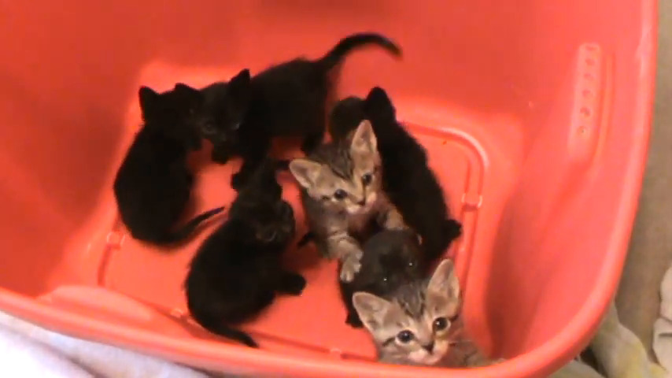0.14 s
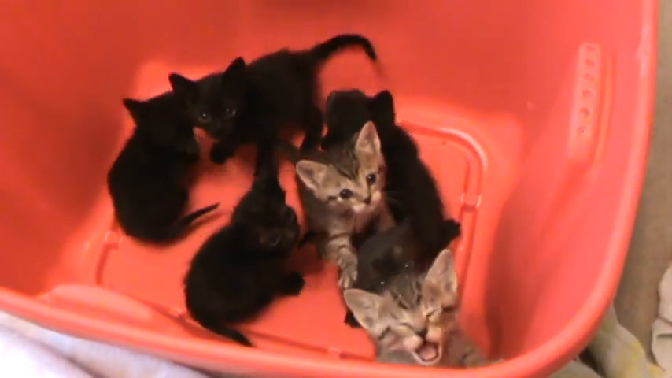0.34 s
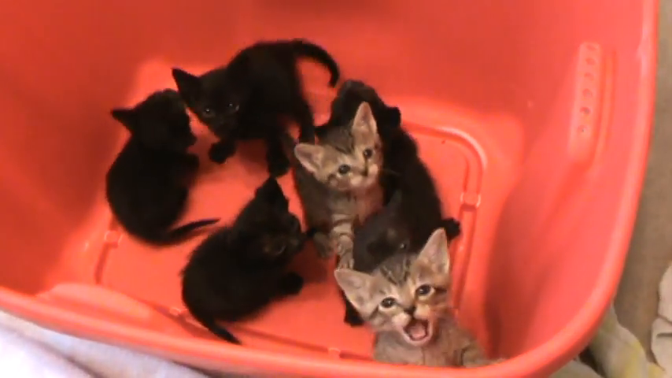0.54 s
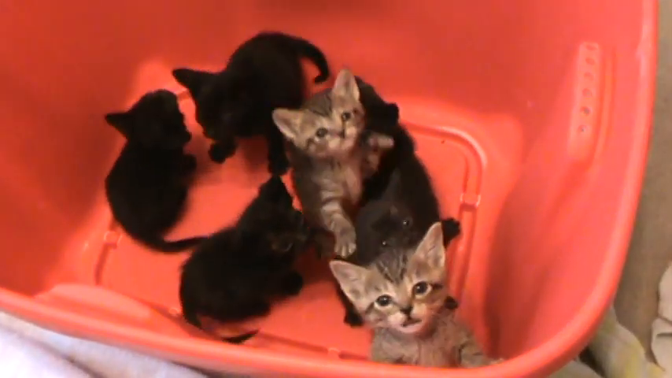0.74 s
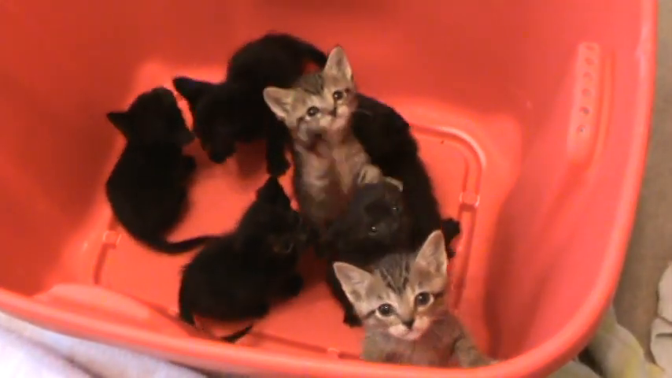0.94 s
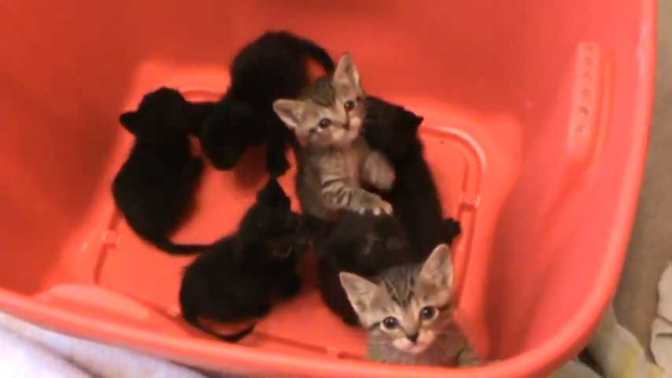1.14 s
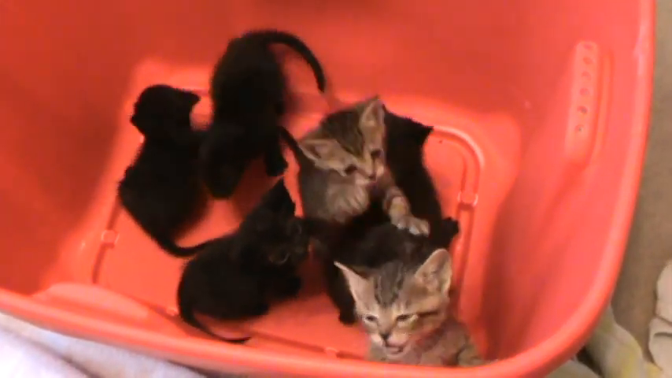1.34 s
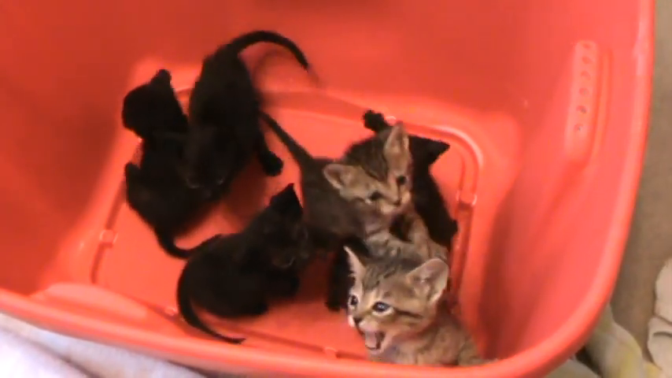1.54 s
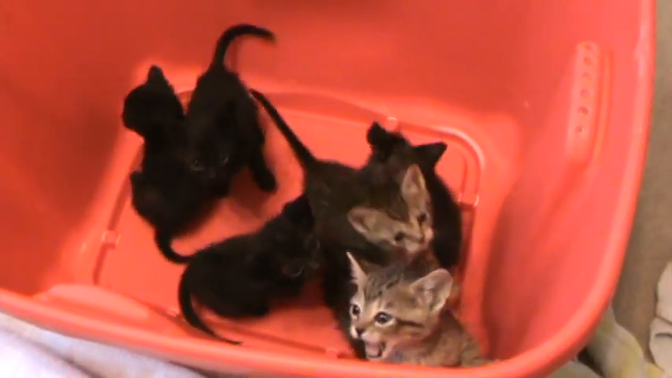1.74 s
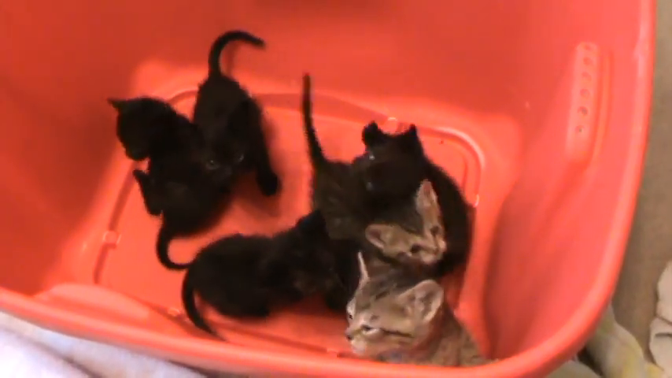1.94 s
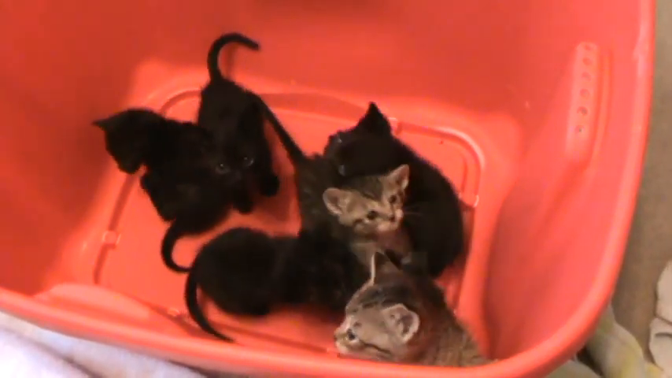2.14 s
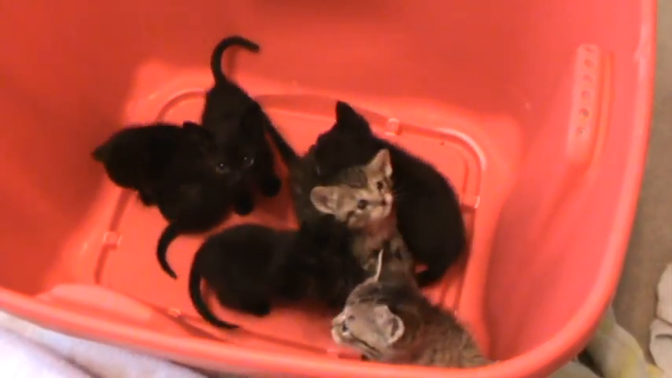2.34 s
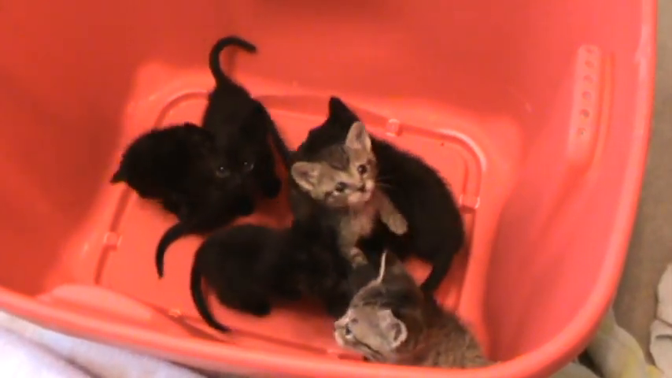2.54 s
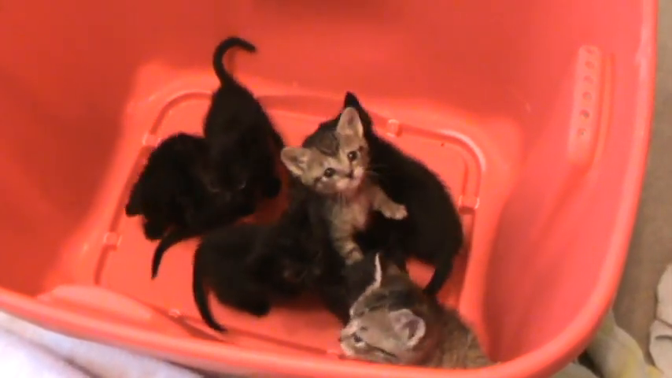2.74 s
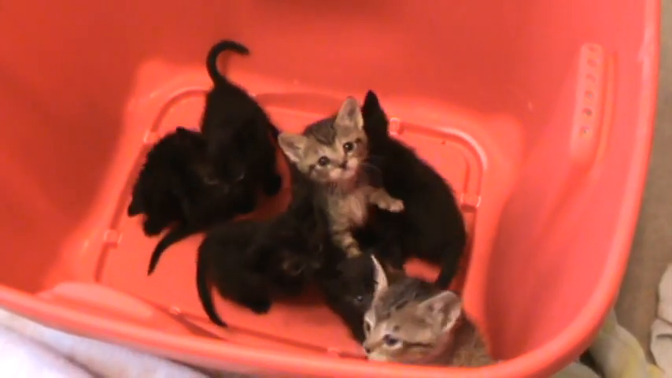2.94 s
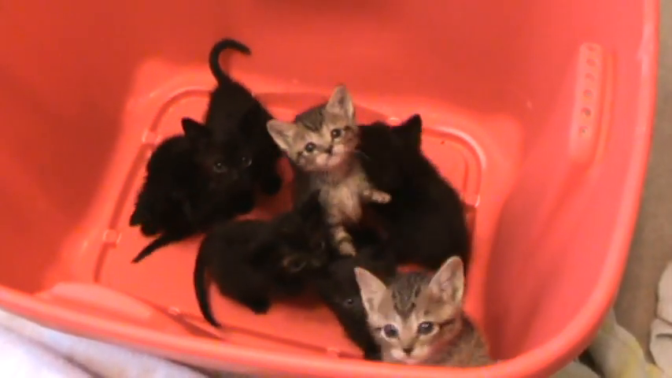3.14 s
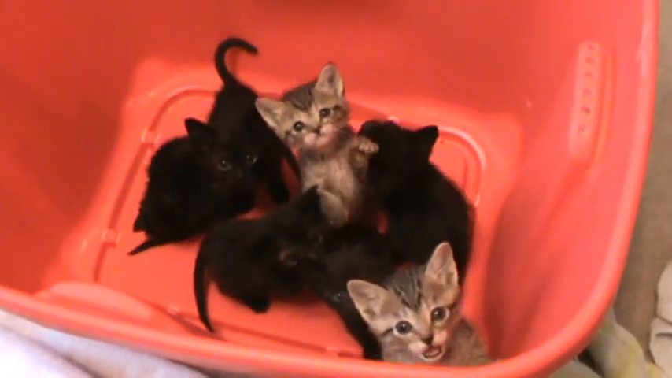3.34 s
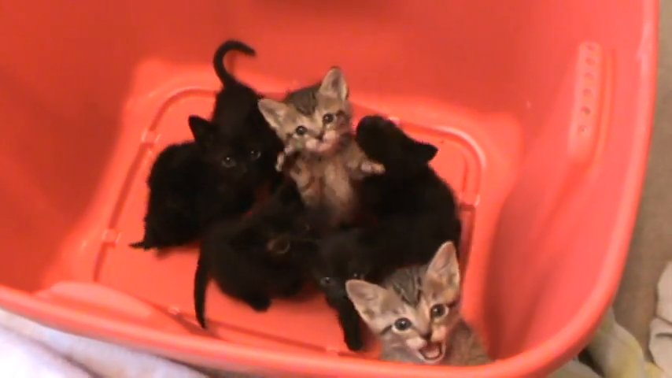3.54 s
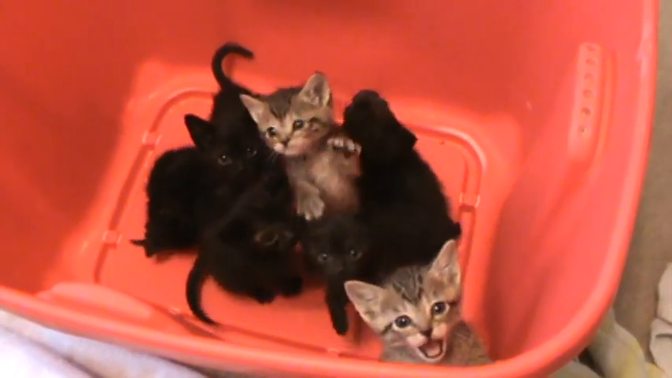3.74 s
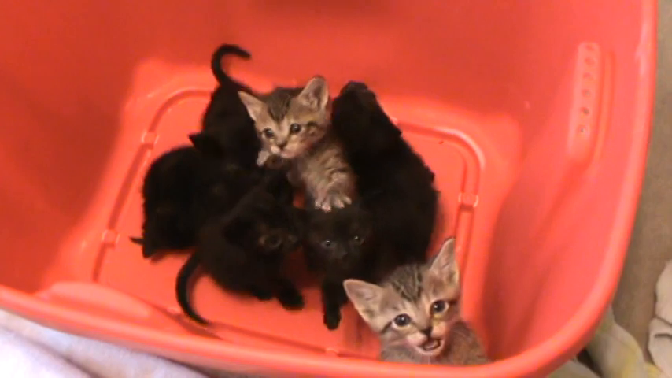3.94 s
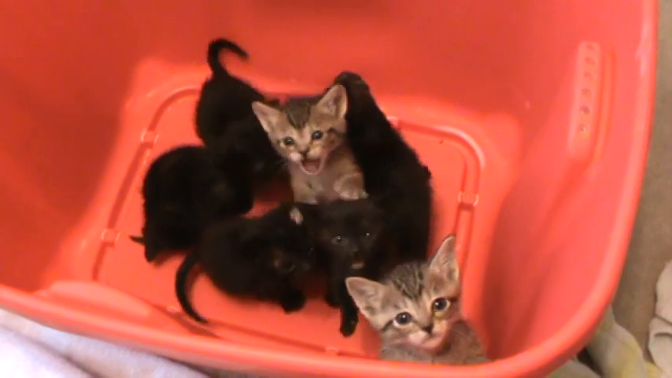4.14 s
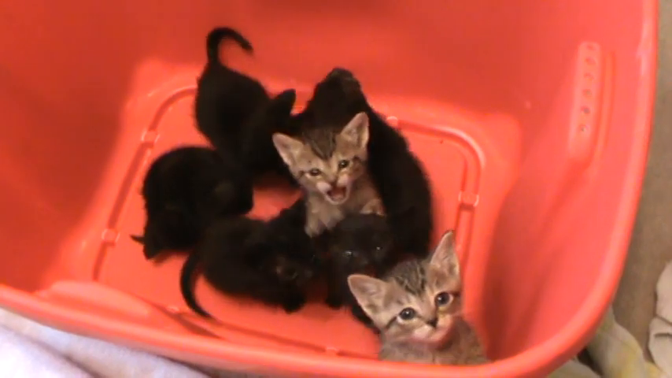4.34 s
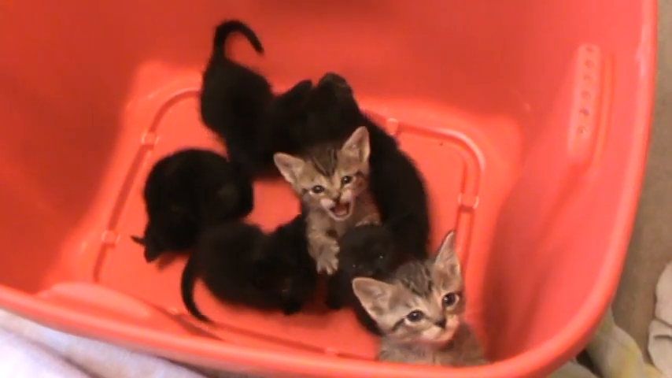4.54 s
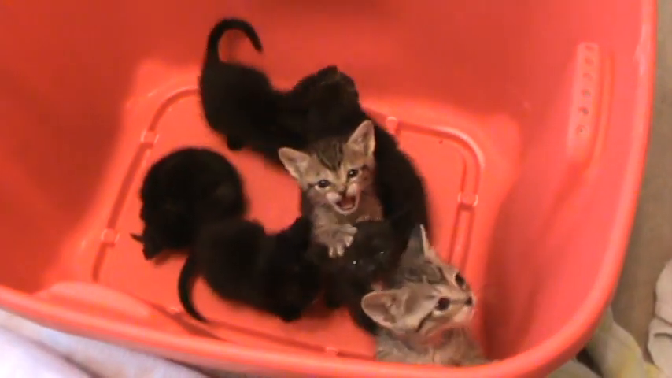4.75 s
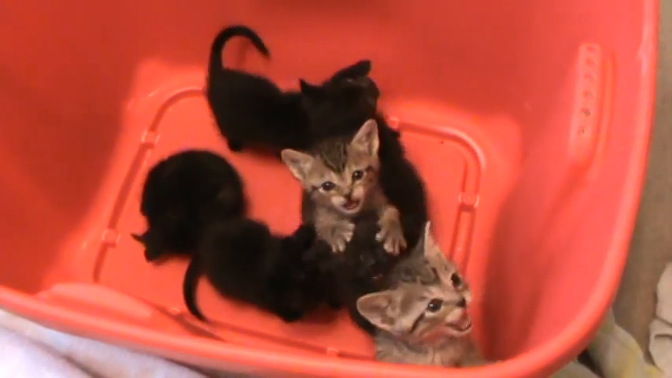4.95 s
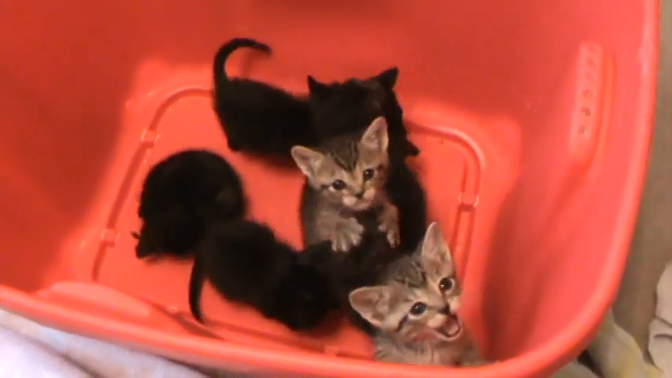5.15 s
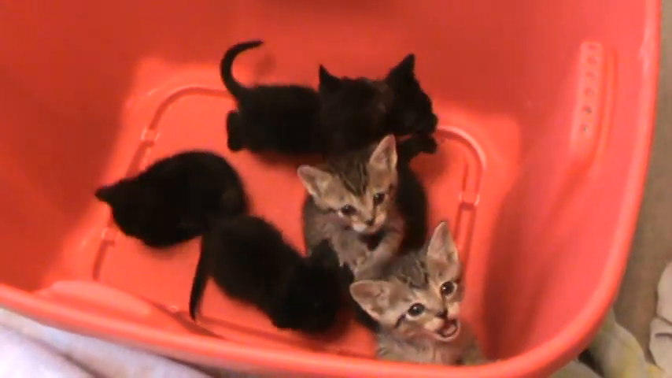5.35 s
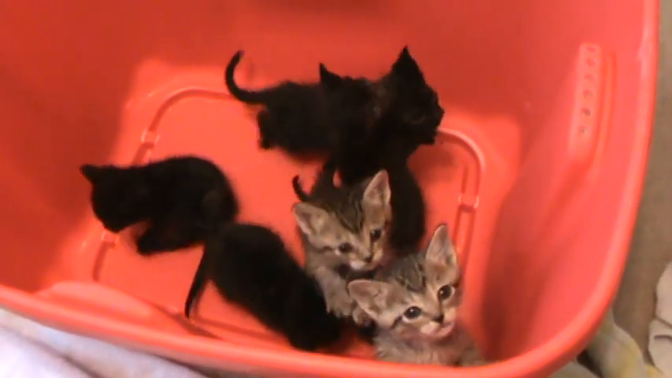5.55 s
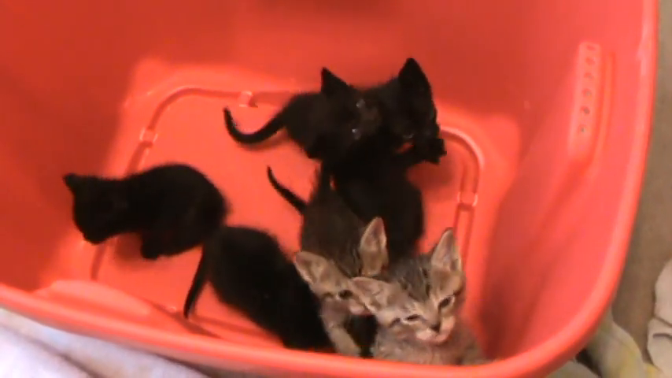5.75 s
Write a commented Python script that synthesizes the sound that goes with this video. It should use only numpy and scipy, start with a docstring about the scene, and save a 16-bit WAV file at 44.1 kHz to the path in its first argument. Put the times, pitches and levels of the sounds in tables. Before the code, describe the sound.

Close-up of tiny kittens calling for food in a plastic tub, in a quiet room with faint low hush. Two mews already under way fade by 0.4 s, with soft hollow paw bumps around 0.2 s. A loud, shrill meow runs from 0.25 to 0.9 s with a weaker voice beneath, splitting into a rough double tone near 0.7 s. From 0.95 to 1.95 s a rising call is joined by a piercing cry and a fainter one, with small thuds between. After a lull, a softer mew swells from 2.5 to 3.4 s; a low scuffle at 3.3 s leads into another sharp cry until 4.1 s. Three lower, hoarser voices overlap from 3.9 to 5.1 s. A final bright cry rises at 4.9 s, cracks and ends around 5.5 s, leaving light fur and claw brushing that grows toward the end. Echoes are short.

```python
"""Hungry kittens in a plastic tub

Kittens meow, up to three at once. Each meow is an arched stack of harmonics shaped by throat, nose and mouth.
A voice turns hoarse as its pitch falls from the top; voices crack now and then, and one cry splits in two.
Paws ring the tub's low modes; filtered noise makes the rumble, the brushing of fur and claws, and the room's hush.
Fading noise serves as the short echoes of tub and room, and a limiter holds down the loudest cries."""
import sys
import numpy as np
from scipy import signal
from scipy.fft import rfft, irfft
from scipy.io import wavfile
from scipy.ndimage import uniform_filter1d, minimum_filter1d, map_coordinates

SR = 44100
rng = np.random.default_rng(int(sys.argv[2]) if len(sys.argv) > 2 else 0)


def digitize_waveform(pressure):
    """Quantize a signal to 16-bit integers and store it at the path in sys.argv[1].

    Rows of a 2-D input are taken as channels; values are limited to [-1, 1].
    """
    field = np.atleast_2d(pressure).T
    bounded = np.clip(field, -1, 1)
    quanta = np.round(bounded * 32767).astype(np.int16)
    wavfile.write(sys.argv[1], SR, quanta)


N = 259308
TIME = np.arange(N) / SR
TOP_HZ = 15800  # nothing sounds above this

# pitch arch of each meow: start_s, top_s, end_s, start_hz, top_hz, sag_hz, final drop_hz,
# rise_power [no unit], sag_power [no unit]
PITCH_ARCHES = [(-0.5, -0.091, 0.409, 800, 1297, 330, 202, 2.5, 2.8),
                (-0.6, -0.15, 0.21, 800, 1275, 196, 271, 2.5, 2.0),
                (0.254, 0.481, 0.875, 1165, 1690, 170, 170, 2.1, 1.0),
                (0.379, 0.587, 0.948, 1017, 1243, 204, 74, 1.9, 1.0),
                (0.948, 1.583, 1.936, 758, 1382, 222, 198, 3.9, 2.2),
                (1.357, 1.636, 1.966, 878, 1629, 257, 156, 2.4, 2.2),
                (1.357, 1.67, 1.856, 937, 1137, 132, 187, 2.7, 1.6),
                (2.49, 3.044, 3.377, 690, 1268, 306, 186, 3.0, 1.4),
                (3.327, 3.635, 4.111, 996, 1666, 196, 321, 2.5, 1.0),
                (3.93, 4.407, 4.829, 551, 1099, 142, 247, 4.4, 1.8),
                (4.126, 4.315, 5.138, 1020, 1397, 396, 239, 1.2, 2.6),
                (4.146, 4.469, 4.89, 970, 1285, 50, 40, 2.4, 3.0),
                (4.869, 5.266, 5.542, 833, 1625, 267, 378, 3.3, 1.0)]


def undb(db):
    """Turn decibels into gain."""
    return 10 ** (np.asarray(db) / 20)


def colour_db(hz, points):
    """Read a spectrum given as (Hz, dB) points, with straight lines between them on a log-frequency axis."""
    point_hz, point_db = np.transpose(points)
    return np.interp(np.log(hz + 1), np.log(point_hz), point_db)


def noise(points, count):
    """Coloured noise of rms 1: white noise filtered to follow the (Hz, dB) points."""
    gain = undb(colour_db(np.fft.rfftfreq(count, 1 / SR), points))
    x = irfft(rfft(rng.standard_normal(count)) * gain, count)
    return x / x.std()


def wander(t, rate_hz):
    """A smooth random drift of spread near 1, with rate_hz new random values a second."""
    steps = (t - t[0]) * rate_hz
    return map_coordinates(rng.standard_normal(4096), [steps], order=3, mode="wrap")


def place(x, pan_db):
    """Set a mono sound between the sides; pan_db is how much louder the left is."""
    return x * undb(np.array([[pan_db], [-pan_db]]) / 2)


def arch(t, start, top, end, start_hz, top_hz, sag_hz, drop_hz, rise_power, sag_power):
    """The pitch of a meow climbs to its top, sags, and drops away at the end as the air runs out."""
    to_top = np.clip((top - t) / (top - start), 0, 1)
    past_top = np.clip((t - top) / (end - top), 0, 1)
    collapse = np.exp(np.minimum(t - end, 0) / 0.038)  # time constant in s
    rise = (top_hz - start_hz) * to_top ** rise_power
    return top_hz - rise - sag_hz * past_top ** sag_power - drop_hz * collapse


def resonance(hz, centre_hz, width_hz):
    """The pull of a resonance on a tone: 1 at its centre, near 0 far from it."""
    return 1 / (1 + ((hz - centre_hz) / width_hz) ** 2)


def meow(course, colour):
    """One call: quavering vocal folds, harmonics shaped by throat, nose and mouth, and a little air."""
    # where voices dip and turn raspy: time_s, half_length_s, dip [share of pitch]
    cracks = [(.85, .012, .03), (1.04, .012, .03), (1.84, .03, .01), (2.63, .018, .035), (3.16, .03, .018),
              (3.99, .014, .03), (5.375, .022, .04)]
    # colour shared by all the kittens' throats: pitch_hz, level_db
    throat = [(600, -5), (1300, 1.5), (1900, 4.5), (2500, -1), (3200, 1.1), (5000, -0.7), (7500, -2),
              (10000, -13), (12500, -26), (16000, -37.5)]
    # air rushing through the mouth: pitch_hz, level_db
    breath = [(1700, -19), (3500, 0.5), (7000, 2.5), (16000, -30)]
    level, swell_db, opens, shuts, first_hz, last_hz, mouth_db, nose_hz, nose_db, bright_db, brighten_db = colour
    fade_s = 0.02
    start, end = course[0] - fade_s / 2, course[2] + fade_s / 2
    live = (TIME > start) & (TIME < end)
    t = TIME[live]
    along = (t - start) / (end - start)  # 0 at the start, 1 at the end

    crack = sum(dip * np.exp(-((t - s) / half_s) ** 2) for s, half_s, dip in cracks)
    pitch = arch(t, *course) * (1 - crack)
    slack = 1 - pitch / pitch.max()  # how far the pitch lies under its top, as a share

    # a call starts through the nose; then the jaw opens fast and shuts slowly
    opened = (1 + np.tanh((t - start - opens) / 0.055)) / 2
    jaw = opened * (1 + np.tanh((start + shuts - t) / 0.13)) / 2
    mouth_hz = first_hz + (last_hz - first_hz) * along

    # level and treble follow the effort that holds the pitch up
    level_db = level + swell_db * (along - 0.5) - 26.5 * slack
    level_db = level_db + 1.52 * jaw  # an open mouth is louder
    treble_db = bright_db + brighten_db * (along - 0.5) - 13.5 * slack
    treble_db = treble_db - 38 * np.exp((start - t) / 0.03)  # the folds start softly: treble comes late

    # slack folds vibrate unevenly; the rise is cleaner than the fall
    slackness = slack * np.where(t < course[1], 0.722, 1) + 2.86 * crack
    hoarse = np.clip(slackness / 0.23, 0, 1)
    quaver = (0.0038 + 0.011 * hoarse) * wander(t, 70)  # share of pitch
    jitter = (0.0026 * np.sqrt(hoarse + 0.18) + 0.018 * hoarse ** 2) * wander(t, 900)
    phase = 2 * np.pi * np.cumsum(pitch * (1 + quaver + jitter)) / SR
    gasp_rate_hz = 170
    tremble_db = 3 * np.sqrt(hoarse) * wander(t, gasp_rate_hz)  # the push of air is unsteady too

    voice, upper_power = np.zeros(len(t)), np.zeros(len(t))
    for k in np.arange(1, 19):
        hz = k * pitch
        in_mouth = resonance(hz, mouth_hz, width_hz=500)
        in_nose = resonance(hz, nose_hz, width_hz=720)
        # folds that snap shut harder lift the upper harmonics
        snap_db = treble_db * np.clip((hz - 2000) / 3000, 0, 1)
        # heads move, so each harmonic sways on its own; one on the mouth's resonance holds steadier
        quick_db = 3.5 * wander(t, gasp_rate_hz / 2) * min(k / 3, 1)
        sway_db = 2.5 * wander(t, 9.23)
        flutter_db = (1 - in_mouth) * (quick_db + sway_db)
        tract_db = colour_db(hz, throat) + nose_db * (1 - opened) * in_nose
        tract_db = tract_db + mouth_db * jaw * in_mouth ** 1.105  # the power steepens the resonance
        size = undb(level_db + tract_db + snap_db + flutter_db + tremble_db) * (hz < TOP_HZ)
        voice += np.sqrt(2) * size * np.sin(k * phase + rng.uniform(0, 2 * np.pi))
        upper_power += size ** 2 * (k > 3)

    # air escapes once a cycle and grows with the upper harmonics
    puffs = noise(breath, len(t)) * (1 + np.cos(phase))
    upper_level = np.sqrt(np.abs(uniform_filter1d(upper_power, SR // 50)))
    air = puffs * upper_level * undb(-25 + 11 * hoarse)  # a hoarse voice leaks more

    # at both ends the tone gives out before the air does
    edge = np.clip(np.minimum(t - start, end - t) / fade_s, 0, 1)
    out = np.zeros(N)
    out[live] = voice * edge ** 2 + air * np.sqrt(edge)
    return out


def shuffle():
    """Restless bodies rumble the tub faintly, with one scuffle, and fur and claws brush the plastic."""
    # fur and claws brushing the plastic: time_s, level_db
    brush_levels = [(5.651, -81), (5.672, -51.5), (5.702, -68), (5.738, -53), (5.82, -54), (5.832, -44),
                    (5.88, -42.5)]
    # the hiss of that brushing: pitch_hz, level_db
    brush_colour = [(1000, -8.5), (4500, -4), (8000, 0), (12000, -19)]
    scuffle_s, scuffle_width_s, scuffle_db = 3.31, 0.05, 18
    scuffle = scuffle_db * np.exp(-((TIME - scuffle_s) / scuffle_width_s) ** 2)
    rumble_db = -61 + 3 * wander(TIME, 14) + scuffle
    rumble = noise([(120, -42), (220, -3.5), (900, -9.5), (6000, -38)], N) * undb(rumble_db)
    brush_s, level_db = np.transpose(brush_levels)
    brush_db = np.interp(TIME, brush_s, level_db) + 2 * wander(TIME, 180)
    return rumble + noise(brush_colour, N) * undb(brush_db)


def room_hush():
    """The quiet room: steady coloured noise, alike left and right only in the bass."""
    # colour of the hush: pitch_hz, level_db (per Hz, relative)
    floor = [(15, -38), (25, -5), (107, -5), (399, -8), (523, -6.5), (1570, -17.5), (2230, -20.5),
             (15500, -26)]
    hush_db = -51
    bass_cut = signal.butter(1, 150, "high", fs=SR, output="sos")
    side = signal.sosfilt(bass_cut, noise(floor, N))
    # the side noise is added on the left and taken away on the right
    return undb(hush_db) * (noise(floor, N) + 0.55 * side * np.array([[1], [-1]]))


def paws():
    """Soft blows ring the tub's low modes, which die away, each with a short dull tap of noise."""
    # paws bumping the tub: time_s, level_db (peak of the ring)
    bumps = [(0.157, -26), (0.215, -16), (0.248, -27), (1.262, -32), (1.343, -31), (1.507, -29),
             (2.184, -33.5), (3.088, -38.5), (2.741, -40.5), (5.457, -31.5), (5.736, -43.5)]
    # the tub's modes: pitch_hz, level_db (relative), t60_s (time to fade by 60 dB)
    tub_modes = [(221, 5, 0.075), (260, 0, 0.072), (304.7, 0.5, 0.14), (526, 5.5, 0.021),
                 (780, -5.5, 0.067)]
    tap_db = -13
    out, t = np.zeros(N + SR), TIME[:SR // 2]
    for bump_s, bump_db in bumps:
        ring = np.zeros(len(t))
        for hz, mode_db, t60 in tub_modes:
            size = undb(mode_db + 2 * rng.standard_normal())  # every blow excites the modes differently
            ring += size * np.cos(2 * np.pi * hz * t) * np.exp(-np.log(1000) * t / t60)
        ring *= 1 - np.exp(-t / 0.001)  # a soft pad takes a moment to push
        tap = noise([(100, -35), (400, 3), (900, 1), (9000, -55)], len(t)) * np.exp(-t / 0.008)
        start = int(bump_s * SR)
        out[start:start + len(t)] += undb(bump_db) * (ring / np.abs(ring).max() + undb(tap_db) * tap)
    return out[:N]


def two_tone():
    """Two pitches in one throat modulate each other, heard as a row of sum tones."""
    start_s, end_s, level_db = 0.67, 0.883, -40.5
    t = TIME[(TIME > start_s) & (TIME < end_s)]
    phases = []
    for course in PITCH_ARCHES[2:4]:  # the higher pitch, then the lower
        pitch = arch(t, *course) * (1 + 0.006 * wander(t, 70))
        phases.append(2 * np.pi * np.cumsum(pitch) / SR)
    high, low = phases
    tones = np.zeros(len(t))
    # each tone is the high pitch plus a multiple of the low one
    for multiple, db in enumerate([-7, 3, -9, -1.5, -1, -9], start=1):
        tones += undb(db + 4.9 * wander(t, 60)) * np.sin(high + multiple * low)
    faded = tones * signal.windows.tukey(len(t), 0.5)
    return undb(level_db) * np.interp(TIME, t, faded, left=0, right=0)


def echoes(x):
    """Dense reflections from the tub and the room die quickly and differ left and right."""
    echo_db, t60_s = -15, 0.43
    t = TIME[:SR // 2]
    tail = np.exp(-np.log(1000) * t / t60_s)
    response = rng.standard_normal((2, len(t))) * tail / np.linalg.norm(tail)
    return undb(echo_db) * signal.fftconvolve(x, response, axes=1)[:, :N]


def scene():
    """Kittens and tub with their echoes, over the room's hush."""
    # voice of each meow, in the order of PITCH_ARCHES: level_db, swell over the call_db,
    # mouth opens_s and shuts_s (after the start), mouth resonance first_hz and last_hz, mouth gain_db,
    # nose resonance_hz, nose gain_db, brightness_db, change of brightness over the call_db
    voices = [(-42, 4.5, 0.2, 1.02, 3160, 3580, 8.3, 6000, 12, 2.5, 2.5),
              (-39, -10.5, 0.2, 0.65, 4700, 1400, 1, 6000, 12, 6, -5),
              (-31, -3.5, 0.13, 0.68, 2440, 4430, 25.2, 6400, 14.7, -7, -25),
              (-58, 14, 0.1, 0.56, 2630, 2960, 28.5, 5800, 17.3, 20.5, -32),
              (-40.5, 4.5, 0.36, 0.95, 3540, 3750, 21.5, 7300, 6.5, 9, -12),
              (-32, -2.5, 0.21, 0.58, 5030, 3020, 37.5, 6500, 6, -0.5, -11),
              (-48, 0, 0.057, 0.24, 3070, 3500, 0.84, 6670, 13, 8.5, -41),
              (-43.5, 14.5, 0.4, 0.75, 5630, 3380, 30.6, 6750, 13, 5, -17.5),
              (-34, -2, 0.15, 0.65, 2950, 3100, 28.4, 6000, 20, -3, -9.5),
              (-44.5, 2, 0.22, 1.4, 5400, 2900, 9.3, 6390, 3, 8, -5.5),
              (-40.5, 10.5, 0.18, 0.88, 3460, 3720, 27, 9300, 4.3, 9.5, -16),
              (-47, 4.5, 0.29, 0.53, 2500, 8100, 6, 7980, 10.3, 15, -8),
              (-32, -2, 0.15, 0.58, 4230, 2670, 25.7, 6100, 16.9, -2, -12)]
    kittens = np.zeros((2, N))
    for course, colour in zip(PITCH_ARCHES, voices):
        # the shrillest calls come from about the middle, the others from further left
        shrill = course[4] > 1500
        kittens += place(meow(course, colour), pan_db=-0.2 if shrill else 1.7)
    tub = place(shuffle() + paws(), pan_db=1.2)
    near = kittens + tub + two_tone()
    return near + echoes(near) + room_hush()


def record(dry):
    """The recorder's limiter holds down the loudest cries on both sides alike; the top is cut."""
    ceiling, hold = 0.55, SR // 100  # the hold is 10 ms
    gain = ceiling / np.maximum(np.abs(dry).max(axis=0), ceiling)
    gain = uniform_filter1d(minimum_filter1d(gain, hold), hold)
    top_cut = signal.ellip(10, 0.2, 80, TOP_HZ, fs=SR, output="sos")
    return signal.sosfilt(top_cut, dry * gain)


dry = scene()
out = record(dry)
digitize_waveform(out)
```